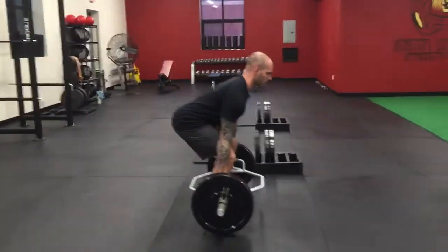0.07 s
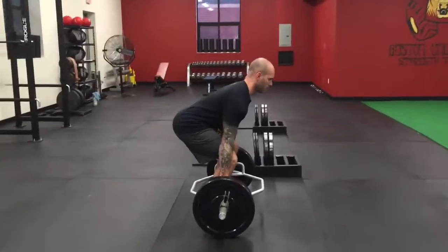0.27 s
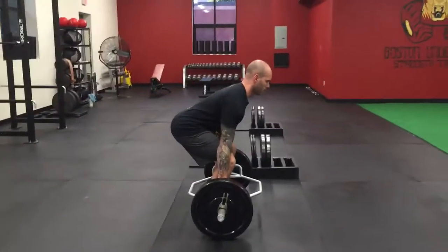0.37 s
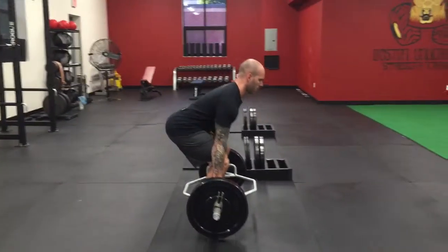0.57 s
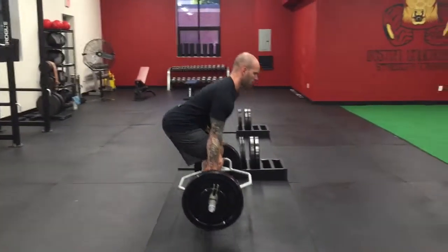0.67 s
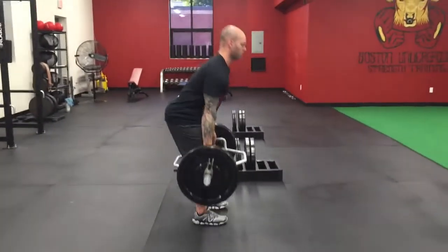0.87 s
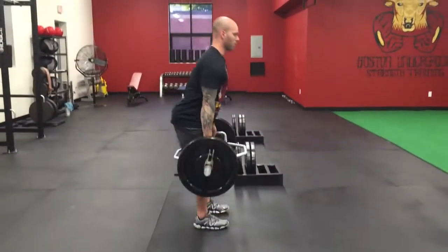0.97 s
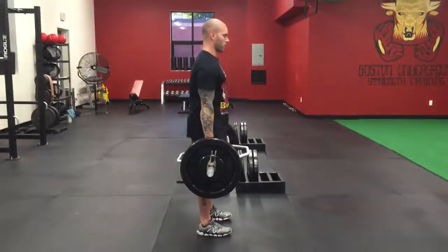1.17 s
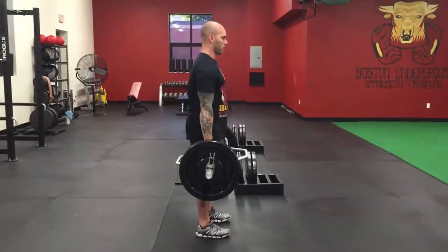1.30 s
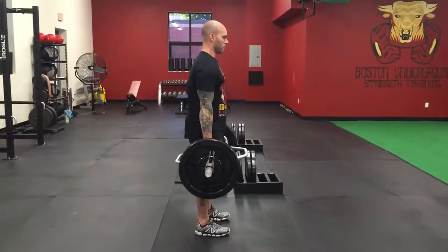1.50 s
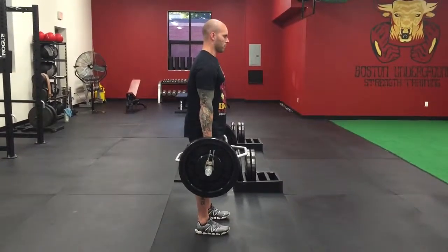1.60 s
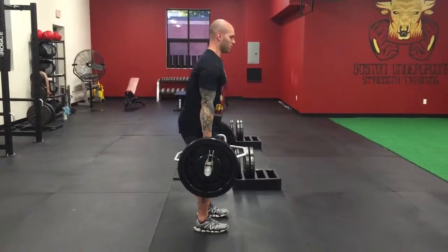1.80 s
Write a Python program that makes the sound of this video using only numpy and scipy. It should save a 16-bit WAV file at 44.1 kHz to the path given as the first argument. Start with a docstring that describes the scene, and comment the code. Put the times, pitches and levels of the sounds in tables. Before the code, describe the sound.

After a brief low hum over quiet room rumble, heavy weight plates thump down once, clank and rattle on their sleeves, then reverberation dies away in a big hard-walled gym, picked up by a phone in mono.

```python
"""A loaded bar lands on the rubber floor of a large hard-walled gym, a few metres from a phone.
The floor thuds as short pushes strike damped resonances; iron plates clank on their sleeves
amid a fading rattle, as noise bursts ringing iron modes. Noise bands dying at their own rates make
the hall ring out after the iron. Shaped noise gives the ventilation rumble and hiss underneath;
a low sine hum swells, then sinks away as the bar lands."""
import sys
import numpy as np
from scipy import signal
from scipy.fft import rfft, irfft
from scipy.io import wavfile
from scipy.ndimage import uniform_filter1d

SR = 44100
rng = np.random.default_rng(int(sys.argv[2]) if len(sys.argv) > 2 else 0)


def boost(x):
    """Linear amplitude factor 10**(x/20) for a level x in decibels (scalar or array-like)."""
    u = np.asarray(x, float) / 20
    return 10 ** u


def to_wav(s):
    """Save 16-bit WAV."""
    ch = np.atleast_2d(s).T  # columns
    pcm = np.round(np.clip(ch, -1, 1) * 32767)  # PCM
    wavfile.write(sys.argv[1], SR, pcm.astype(np.int16))


N = 81585  # length in samples, 1.85 s


def air():
    """Ventilation rumble and room hiss: steady noise shaped by a spectrum curve."""
    # The empty room's spectrum. Each row: frequency in Hz, relative level in dB.
    spectrum = [(20, -35), (35, -3), (45, -6.5), (59, 1), (78, -9), (110, -1), (141, -10.5), (177, -11),
                (260, -21.5), (336, -26), (500, -32), (714, -36), (1090, -35.5), (1560, -38.5),
                (2200, -38.5), (2800, -41), (3200, -39.5), (3900, -40.5), (4600, -45.5), (7000, -48.5),
                (10500, -52.5), (13000, -52), (15900, -55)]
    level_db = -50  # rms of the whole bed, ahead of the microphone
    hz, db = np.transpose(spectrum)
    log_f = np.log(np.fft.rfftfreq(N, 1 / SR) + 1)
    gain = boost(np.interp(log_f, np.log(hz), db))
    bed = irfft(rfft(rng.standard_normal(N)) * gain, N)
    return bed * boost(level_db) / np.sqrt(np.mean(bed ** 2))


def hum():
    """A plain low sine of gliding pitch that swells, sinks and stops."""
    # The hum's path. Each row: time in seconds, frequency in Hz, level in dB rms at the microphone.
    path = [(0, 115, -43), (.03, 113, -42.5), (.09, 110.5, -41), (0.167, 107.7, -37.5), (0.196, 112.6, -40),
            (.225, 104, -46), (.25, 106, -77)]
    t = np.arange(N) / SR
    when, hz, db = np.transpose(path)
    phase = 2 * np.pi * np.cumsum(np.interp(t, when, hz)) / SR
    level = boost(np.interp(t, when, db, right=-200))  # silent after the last row
    return np.sqrt(2) * level * np.sin(phase)


def ring(x, modes):
    """Damped resonators struck by x, each losing 60 dB in its t60, summed."""
    out = 0
    for hz, db, t60 in modes:
        radius = np.exp(-np.log(1000) / (t60 * SR))
        w = 2 * np.pi * hz / SR
        feedback = [1, -2 * radius * np.cos(w), radius * radius]
        out = out + boost(db) * signal.lfilter([0, np.sin(w)], feedback, x)
    return out


def thud():
    """Each landing or soft bounce pushes the floor with a sine-squared pulse, and the floor rings."""
    # Plates meeting the floor, then bouncing softly. Each row: start in seconds,
    # impulse in dB, push length in seconds (raised to 0.002 if shorter), direction +1 or -1.
    landings = [(.2255, -35.5, 0.0015, -1), (.2345, -24.5, 0.00437, -1), (.2395, -21.5, 0.0037, 1),
                (.2475, -22.5, .0025, -1), (.3380, -30, 0.00437, 1), (0.36, -28, 0.0108, -1),
                (0.441, -32.5, 0.011, -1), (.5300, -31, .012, -1)]
    # Floor slab and rubber rims. Each row: frequency in Hz, relative level in dB, t60 in seconds.
    floor_modes = [(53.1, -5.5, 0.43), (61, -3, 0.38), (76.4, -7, 0.31), (108.5, 1, 0.18), (145, -7, 0.35),
                   (191.4, -15, 0.25), (259.3, -3.5, 0.5), (293, -1, 0.35), (311, -12.5, 0.8),
                   (350.6, 2, 0.076), (423, -6, .1)]
    t, force = np.arange(N) / SR, np.zeros(N)
    for start, db, push, way in landings:
        push = max(push, 0.002)
        progress = np.clip((t - start) / push, 0, 1)
        unit_push = np.sin(np.pi * progress) ** 2 * 2 / (push * SR)  # sums to one
        force += np.sign(way) * boost(db) * unit_push
    return ring(force, floor_modes)


def iron_blows():
    """Lists the iron contacts: set clanks, and among and after them a fading rattle at random moments."""
    # Iron on iron. Each row: start in seconds, relative level in dB,
    # level in dB of the bright part against the dull part.
    clanks = [ (.2262, -48, -50), (.2295, -43, -26), (.2325, -43, -40), (.2348, -46, -6), (0.2357, -45, -3),
              (.2377, -27, -1), (.2400, -32.5, -5), (0.245, -41, 6), (.2548, -31.5, -2.5),
              (.2630, -43.5, -2), (0.2689, -39.5, -6), (0.306, -35, -9), (0.339, -36, -7.5),
              (0.3495, -37, -12)]
    count, start_s, span_s = 70, 0.22, 0.45
    level_db, t60_s = -47, 1  # relative level at the start, time to fade by 60 dB
    scatter_db = 2.5  # mean of the random boost
    rattle = []
    for place, luck in rng.random((count, 2)):
        late = span_s * place
        db = level_db - 60 * late / t60_s - scatter_db * np.log(luck)
        rattle.append((start_s + late, db, -5))
    return clanks + rattle


def iron(blows):
    """Each blow is a short noise burst, heard as a crack and ringing the plates and sleeves."""
    # Plates and sleeves. Each row: frequency in Hz, relative level in dB, t60 in seconds.
    iron_modes = [(632, -5, 0.014), (828, -17, 0.069), (1055, -4.5, .03), (1098, -27.5, 1.56),
                  (1137, -31, 1.63), (1590, -12, 0.017), (1746, -29, 1.6), (2040, 2.5, 0.0076),
                  (2233, -5, 0.032), (2400, -1.5, 0.0053), (4500, -5, 0.0035), (5580, -4, 0.013),
                  (6300, -1.5, 0.011), (7130, -13, 0.0091), (9160, 1.5, 0.0056), (11420, -7.5, 0.0095)]
    size, decay_s = 600, 0.00053  # burst length in samples, decay time constant
    crack_top_hz, crack_gain = 9100, 10
    shape = np.exp(-np.arange(size) / SR / decay_s)
    shape /= np.sqrt(np.sum(shape ** 2))
    dull, bright = np.zeros((2, N))
    for start, db, bright_db in blows:
        i = int(start * SR)
        dull[i:i + size] += boost(db) * shape
        bright[i:i + size] += boost(db + bright_db) * shape

    lowpass = signal.butter(2, crack_top_hz, fs=SR, output="sos")
    out = crack_gain * signal.sosfilt(lowpass, bright * rng.standard_normal(N))

    # The dull part is a softer contact: averaging takes its treble away
    dull = uniform_filter1d(dull * np.sign(rng.standard_normal(N)), size=11)
    dull = 2 * uniform_filter1d(dull, size=5)
    for mode in iron_modes:
        strike = dull
        if mode[0] > 4000:
            strike = bright * np.sign(rng.standard_normal(N))
        out = out + ring(strike, [mode])
    return out


def hall_response():
    """Noise in narrow bands, each building up alike and dying at its own rate."""
    # Hall tail. Each row: band centre in Hz, relative level in dB, t60 in seconds.
    bands = [(45.5, 4, .9), (66.4, -32, 0.3), (89, -22, 0.95), (111, -12.5, 1.3), (173, -11.5, 1.67),
             (259, -16, 1.39), (303, -9, 1.18), (382, -11.5, 1.47), (482, -13, 1.11), (756, -15, 1.32),
             (870, -13.5, 1.56), (1054, -13, 1.8), (1300, -13.5, 1.65), (1870, -12.5, 1.48),
             (2200, -12, 1.45), (2450, -14.5, 1.3), (2890, -18, 1.175), (3900, -18, 1.22),
             (5900, -16.5, 0.96), (7870, -20.5, 0.79), (11200, -26.5, 0.4), (14500, -29, 0.19)]
    delay_s, build_s = 0.0013, 0.0093
    late = np.maximum(np.arange(N) / SR - delay_s, 0)
    log_f = np.log(np.fft.rfftfreq(N, 1 / SR) + 1)
    centres = np.log(np.array(bands)[:, 0])
    noise = rfft(rng.standard_normal(N))
    out = 0
    for (_, db, t60), one_band in zip(bands, np.eye(len(bands))):
        envelope = (1 - np.exp(-late / build_s)) * boost(-60 * late / t60)
        envelope /= np.sqrt(np.sum(envelope ** 2))
        # Each band fades out towards its neighbours' centres
        band = irfft(noise * np.interp(log_f, centres, one_band), N)
        out = out + boost(db) * band / np.std(band) * envelope
    return out


def hall(blows):
    """The iron blows, as bare clicks of random sign, set off the hall tail by convolution."""
    gain_db = 30
    dull, bright = np.zeros((2, N))
    for start, db, bright_db in blows:
        i = int(start * SR)
        dull[i] += boost(db)
        bright[i] += boost(db + bright_db)
    clicks = np.array([dull, bright]) * np.sign(rng.standard_normal(N))
    soft = uniform_filter1d(uniform_filter1d(clicks, size=9), size=9)
    source = soft[0] + clicks[1] - soft[1]  # lows of the dull part, highs of the bright
    return boost(gain_db) * signal.fftconvolve(source, hall_response())[:N]


def scene():
    """Room bed, hum, floor, iron and hall as they reach the microphone, on one channel."""
    blows = iron_blows()
    mix = air() + hum() + thud() + iron(blows) + hall(blows)
    return mix[None]


def roll_off(x):
    """The treble ends steeply here."""
    return signal.sosfilt(signal.butter(12, 16020, fs=SR, output="sos"), x)


def record(dry):
    """The phone's microphone path cuts steeply at the top and gently in the bass."""
    top_hz, bass_cut_hz = 15150, 65
    top_cut = signal.ellip(6, 0.2, 30, top_hz, fs=SR, output="sos")
    bass_cut = signal.butter(2, bass_cut_hz, "high", fs=SR, output="sos")
    mix = signal.sosfilt(bass_cut, signal.sosfilt(top_cut, dry))
    return roll_off(mix)


dry = scene()
out = record(dry)
to_wav(out)
```